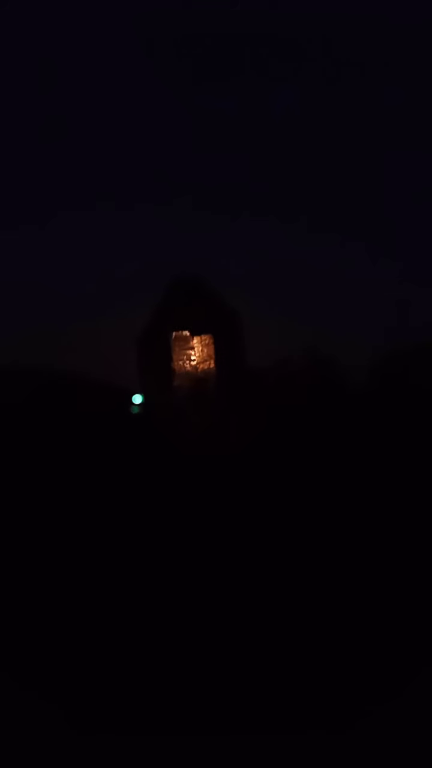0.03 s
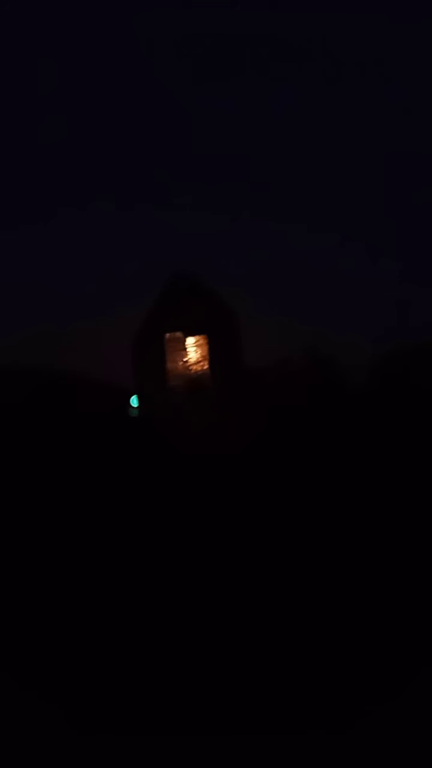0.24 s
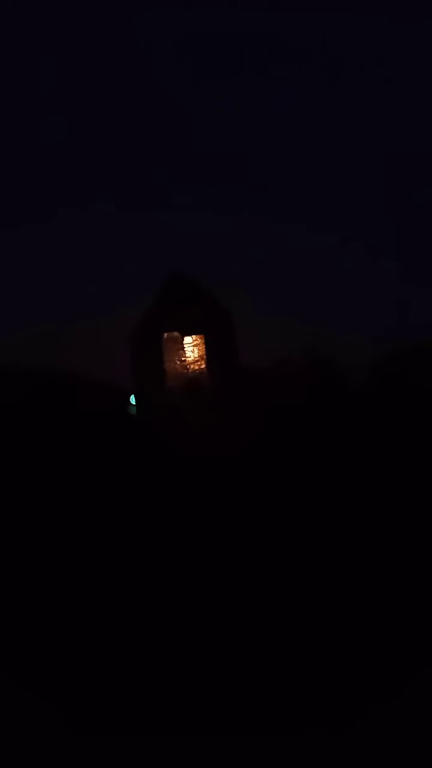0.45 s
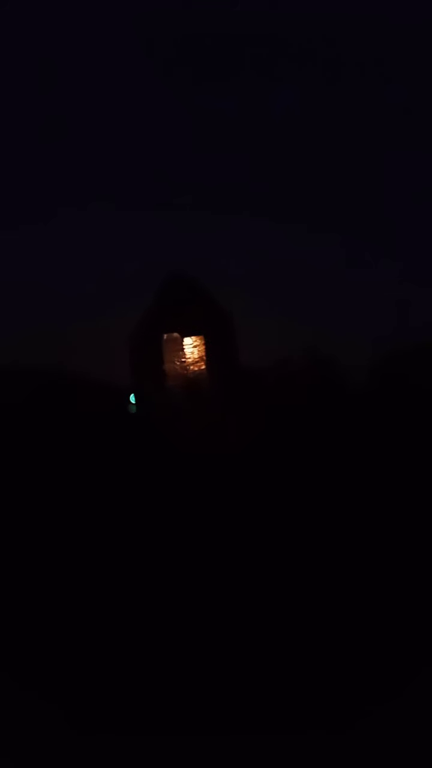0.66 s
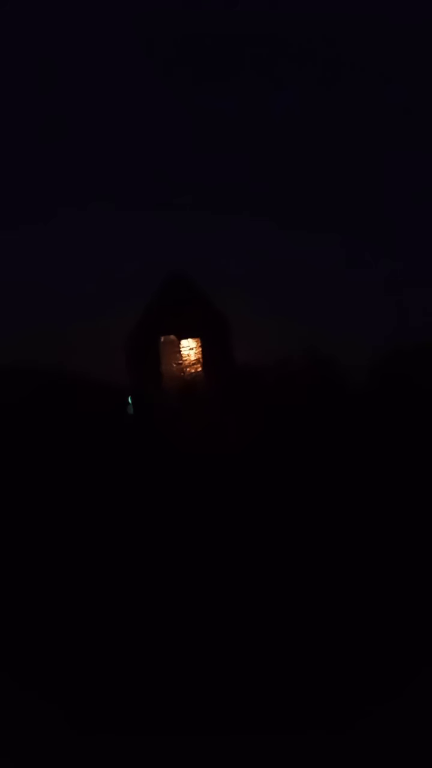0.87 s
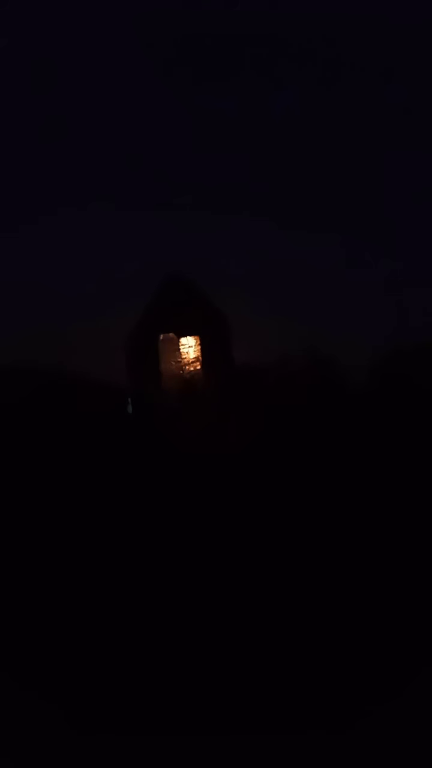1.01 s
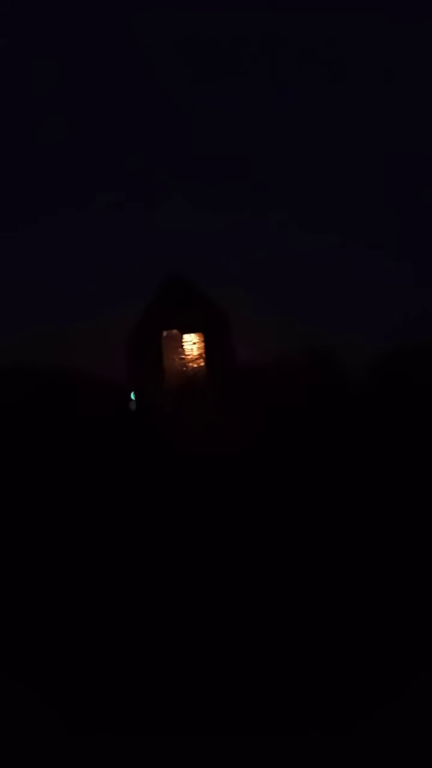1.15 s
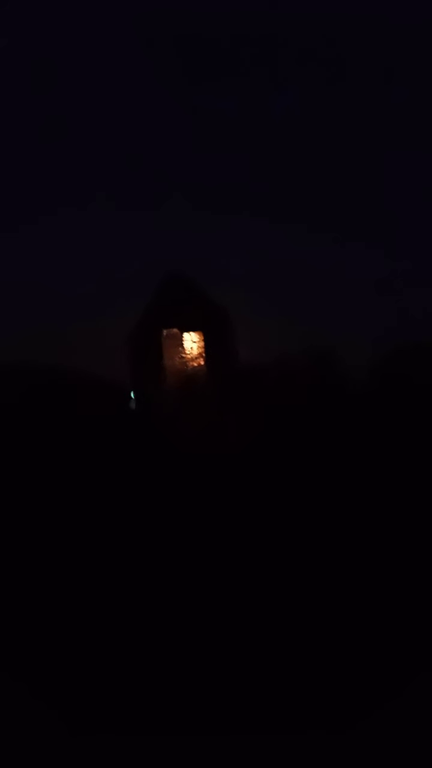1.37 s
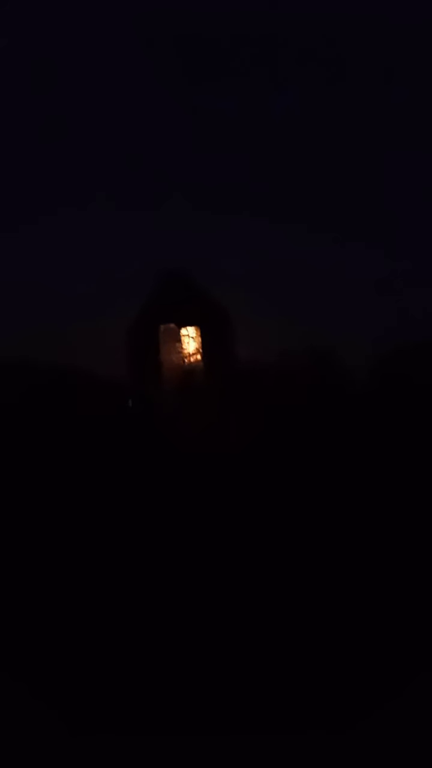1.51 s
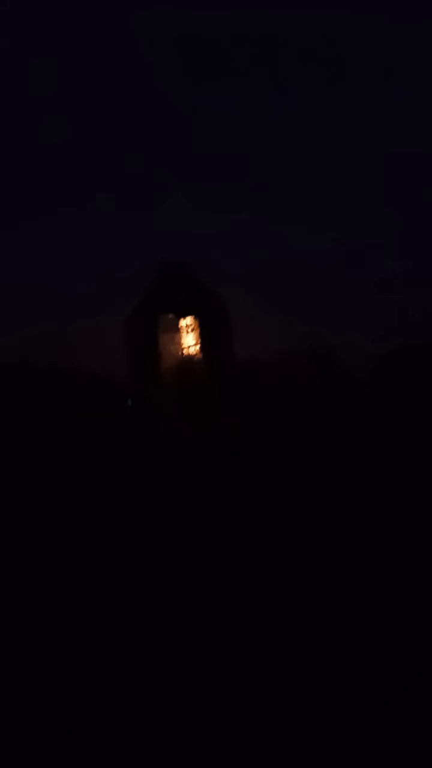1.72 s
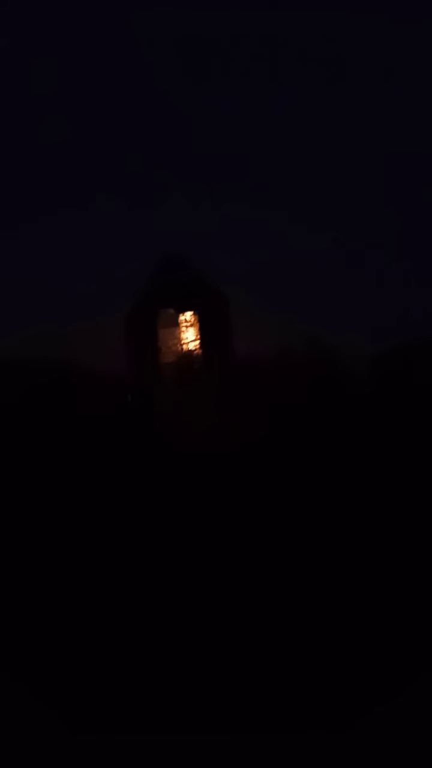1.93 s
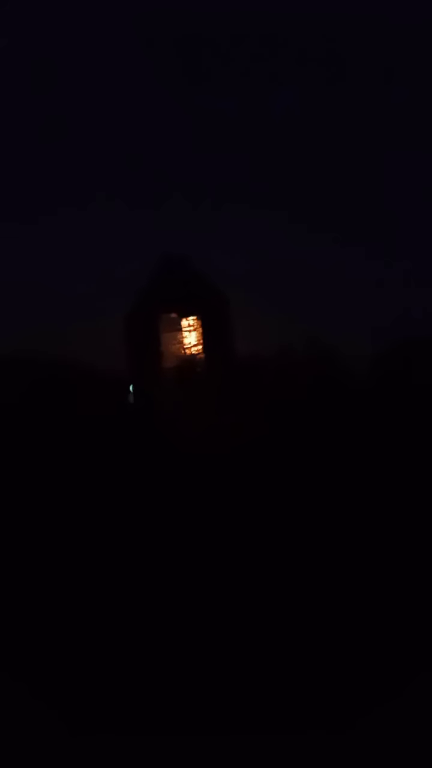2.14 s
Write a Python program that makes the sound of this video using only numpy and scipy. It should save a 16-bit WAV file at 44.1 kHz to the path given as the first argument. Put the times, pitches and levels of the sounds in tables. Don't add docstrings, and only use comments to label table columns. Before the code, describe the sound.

Crickets chirp in a dense high-pitched pulsing chorus across a quiet meadow at night

```python
import sys
import numpy as np
from scipy import signal
from scipy.io import wavfile
from scipy.ndimage import uniform_filter1d

SR = 44100
rng = np.random.default_rng(int(sys.argv[2]) if len(sys.argv) > 2 else 0)


def to_linear_factor(level_db):
    exponent = np.asarray(level_db, float) / 20
    return 10 ** exponent


def to_wav(sig):
    pcm = np.clip(np.atleast_2d(sig), -1, 1) * 32767
    pcm = np.round(pcm).astype(np.int16)
    wavfile.write(sys.argv[1], SR, pcm.T)


N = 96314
T = np.arange(N) / SR

# pitch_hz, pitch_spread_hz, pulses_per_s, sounding_share, level_db
CROWDS = [(2605.1, 110, 60, .45, -47.5), (3186, 150, 65, .45, -49), (4577, 300, 70, .5, -50.5),
          (5483, 240, 60, .5, -38), (5960, 280, 220, 0.33, -56), (7026, 160, 80, .6, -37.5)]
# time_s, level_db
CROWD_SURGE = [(0, -7), (.25, 3.5), (.5, 4.5), (.75, 2), (.95, -8), (1.2, -1), (1.45, 5), (1.75, 3.5),
               (2.2, -11)]
# start_s, length_s, level_db, pitch_hz
TRILLS = [
    (0.189, 0.16, -37.5, 5390),
    (0.197, 0.153, -41, 5653),
    (0.565, 0.11, -40.5, 5600),
    (0.797, 0.17, -43, 5383),
    (1.121, 0.083, -48, 5505),
    (1.388, 0.18, -39, 5400),
    (1.454, .17, -41.5, 5700),
    (1.848, 0.18, -35, 5528),
    (2.011, .2, -40, 5690),
    (2.0, 0.12, -41.5, 5350),
]
# start_s, length_s, level_db
FROG_BOUTS = [
    (-.1, 2.4, -64),
    (0.219, 0.098, -57),
    (0.346, 0.079, -55),
    (.45, .08, -59),
    (0.567, .16, -62.5),
    (0.769, .1, -58.5),
    (1.244, 0.22, -59.5),
    (1.479, 0.085, -57.5),
    (1.598, .33, -60.5),
]
# time_s, pitch_hz, wing_db, low_wing_db, rasp_db
CLOSE_SONG = [
    (0.0, 6530, -17, -38, -29),
    (0.006, 6570, -28, -29, -35),
    (0.012, 6880, -23.5, -27, -31),
    (0.04, 7066, -20.5, -34, -34),
    (0.054, 6409, -19.5, -32, -33.5),
    (0.064, 7067, -35, -33, -33.5),
    (0.078, 6500, -16, -31.5, -42),
    (0.092, 6640, -28, -37, -41),
]
# frequency_hz, level_db (per Hz)
RASP_SPECTRUM = [(1760, -75), (3000, -31.5), (5410, -12.5), (5960, -6.5), (6870, -1.5), (8650, -23.5),
                 (13900, -29)]
# start_s, length_s, level_db
SCRAPES = [
    (0.966, .035, -45),
    (1.015, 0.047, -47.5),
    (1.076, 0.046, -46.5),
]
# frequency_hz, width_hz, level_db
SCRAPE_MODES = [(7600, 630, 6.5), (9140, 1200, -6.5), (11200, 1470, -11)]
# frequency_hz, level_db, t60_s
STEM_MODES = [(470, 2.5, 0.063), (600, -8, .04), (730, 0.5, 0.044), (860, -14, 0.26)]
# frequency_hz, width_hz, level_db
MOTOR_TONES = [(79.8, 7.9, -74), (116.2, 6.9, -79), (162.7, 11.3, -68), (245.7, 3.2, -77.5),
               (236.3, 15.8, -65.5), (978, 7.3, -86.5), (1036, 2.2, -82), (1274, 4.8, -85)]
# time_s, level_db
MOTOR_LOAD = [(0.0, -85), (0.03, -94), (0.07, -67), (0.15, -78), (0.19, -58), (0.24, -76), (0.47, -60),
              (0.66, -72.5), (0.69, -61), (0.79, -73), (1.03, -58), (1.08, -72), (1.12, -59), (1.34, -70),
              (1.37, -58), (1.53, -71.5), (1.82, -63), (2.18, -64.5)]
# start_s, length_s, level_db
MOTOR_WHINES = [
    (.665, .06, -67.5),
    (1.017, 0.059, -80),
    (1.728, .08, -70),
]
# frequency_hz, level_db (per Hz)
RUMBLE_SPECTRUM = [(20, -18), (60, -14), (150, -3), (250, -5.5), (300, -15), (450, -18.5), (600, -28.5),
                   (900, -67)]
# frequency_hz, level_db (per Hz)
HISS_SPECTRUM = [(4820, -46), (8200, 0), (8820, -4.5), (10300, -4), (11400, -9.5), (13400, -9), (13900, -1)]
# time_s, level_db
HISS_FADE = [(0, -0.5), (1.3, 1), (1.45, -0.5), (1.75, -2), (1.85, -3.5), (2.2, -3.5)]
# frequency_hz, level_db (per Hz)
AIR_SPECTRUM = [(500, -41), (1000, -30.5), (1600, -28.5), (2300, -18.5), (3700, -12.5), (6400, 1),
                (7600, -4.5), (8400, -28.5)]
# frequency_hz, threshold_db (against the usual level there)
DROP_THRESHOLD = [(900, -7), (1200, -4.5), (2200, -4.5), (2500, -10), (7700, -9), (8800, 0), (10200, -2.8),
                  (11500, .2), (13500, -3)]


def evened(x):
    return x / np.sqrt(np.mean(x ** 2) + 1e-20)


def over_time(curve):
    return np.interp(T, *np.transpose(curve))


def drift(per_s):
    count = int(N / SR * per_s) + 4
    return 1.2 * np.interp(T * per_s, np.arange(count), rng.standard_normal(count))


def gate(start, length, edge):
    t = T - start
    return np.clip(np.minimum(t, length - t) / edge, 0, 1)


def resonate(x, hz, width):
    turn = np.exp(2j * np.pi * np.cumsum(hz * np.ones(len(x))) / SR)
    r = np.exp(-np.pi * width / SR)
    return 2 * (turn * signal.lfilter([1 - r], [1, -r], x / turn)).real


def double_resonate(x, hz, width):
    return resonate(resonate(x, hz, width), hz, 2 * width)


def coloured(spectrum, patch_db):
    frames = N // 256 + 5
    hz = np.fft.rfftfreq(1024, 1 / SR)
    a, b, patches = rng.standard_normal((frames, 513, 3)).T
    patches = uniform_filter1d(patches, size=10, axis=0)
    patches = evened(uniform_filter1d(patches, size=10, axis=1))
    f, level = np.transpose(spectrum)
    shape = np.interp(np.log(hz + 1), np.log(f + 1), level, left=-80, right=-80)
    z = (a + 1j * b) * to_linear_factor(shape[:, None] + patch_db * patches)
    return evened(signal.istft(z, nperseg=1024, noverlap=768)[1][:N])


def singer(hz, rate, duty, phase, wander=.012, loose=.25):
    strokes = np.cumsum(rate * (1 + loose * np.tanh(drift(per_s=12)))) / SR + phase
    place = np.minimum(strokes % 1 / np.clip(duty, .1, 1), 1)
    sag = .03 * (.5 - place)
    pitch = hz * (1 + sag + wander * drift(per_s=25))
    return np.sin(np.pi * place) * np.sin(2 * np.pi * np.cumsum(pitch) / SR)


def crowd(hz, spread_hz, rate, duty):
    count = 10
    weights = signal.windows.cosine(count + 2)[1:-1]
    offsets = np.linspace(-1.6, 1.6, count)
    chances = rng.uniform(-1, 1, (count, 4))
    out = np.zeros(N)
    for offset, weight, (detune, tempo, phase, size) in zip(offsets, weights, chances):
        voice = singer(hz + spread_hz * (offset + .2 * detune), rate * (1 + .15 * tempo), duty, phase)
        loudness_db = 1.2 * size + 1.5 * drift(per_s=7.13)
        out += weight * to_linear_factor(loudness_db) * voice
    return evened(out)


def far_crickets():
    voices = [to_linear_factor(db) * crowd(hz, spread, rate, duty) for hz, spread, rate, duty, db in CROWDS]
    throb_hz, throb_db, throb_peak_s = 5.13, 1.5, 0.26
    voices[-1] = voices[-1] * to_linear_factor(throb_db * np.cos(2 * np.pi * throb_hz * (T - throb_peak_s)))
    voices[2] = voices[2] * to_linear_factor(over_time(CROWD_SURGE))
    far = sum(voices)
    return to_linear_factor(-1.0) * (far + to_linear_factor(-6) * echoes(far))


def near_trills():
    rate = 63
    trills = np.zeros(N)
    for start, length, db, hz in TRILLS:
        voice = singer(hz, rate, duty=.6, phase=-start * rate, wander=.004, loose=0)
        trills += to_linear_factor(db) * gate(start, length, edge=.008) * evened(voice)
    return trills * to_linear_factor(1.5 * drift(per_s=150))


def frogs():
    bouts = sum(to_linear_factor(db) * gate(start, length, edge=0.016) for start, length, db in FROG_BOUTS)
    croaks = to_linear_factor(1.5 * drift(per_s=8.9))
    return bouts * croaks * crowd(hz=1954, spread_hz=83, rate=68, duty=0.67)


def close_insect():
    time, hz, wing_db, low_db, rasp_db = np.transpose(CLOSE_SONG)
    pitch = np.interp(T, time, hz)
    teeth = rng.standard_normal((N, 2)).T
    clean = .76
    tone = clean * evened(np.sin(2 * np.pi * np.cumsum(pitch) / SR))
    tone = tone + (1 - clean) * evened(double_resonate(teeth[0], pitch, width=300))
    low = double_resonate(teeth[1], hz=5400, width=250)
    rasp = coloured(RASP_SPECTRUM, patch_db=1.5)
    song = evened(tone) * to_linear_factor(np.interp(T, time, wing_db))
    song = song + evened(low) * to_linear_factor(np.interp(T, time, low_db))
    song = song + rasp * to_linear_factor(np.interp(T, time, rasp_db + 9.5))
    stop = np.exp(-np.maximum(T - time[-1], 0) / .002)
    return stop * song


def katydid():
    teeth = rng.standard_normal(N)
    wing = sum(to_linear_factor(db) * evened(resonate(resonate(teeth, hz, width), hz, width))
               for hz, width, db in SCRAPE_MODES)
    return wing * sum(to_linear_factor(db) * gate(start, length, edge=0.012) for start, length, db in SCRAPES)


def stem_knock():
    t = np.maximum(T - .088, 0)
    return sum(to_linear_factor(-57.5 + db - 60 * t / t60) * np.sin(2 * np.pi * hz * t) for hz, db, t60 in STEM_MODES)


def motor():
    load_db = over_time(MOTOR_LOAD) + 64
    pushes = rng.standard_normal((N + SR, len(MOTOR_TONES))).T
    tones = sum(to_linear_factor(db) * evened(double_resonate(push, hz, width)[SR:])
                for push, (hz, width, db) in zip(pushes, MOTOR_TONES))
    swells = sum(to_linear_factor(db) * gate(start, length, edge=0.02) for start, length, db in MOTOR_WHINES)
    whine = np.sin(2 * np.pi * MOTOR_TONES[5][0] * T) * swells
    rumble = to_linear_factor(-66.5 + 0.24 * load_db) * coloured(RUMBLE_SPECTRUM, patch_db=4)
    return to_linear_factor(load_db) * tones + whine + rumble


def far_hiss():
    return to_linear_factor(-56 + over_time(HISS_FADE)) * coloured(HISS_SPECTRUM, patch_db=2.0)


def night_air():
    return to_linear_factor(-40) * coloured(AIR_SPECTRUM, patch_db=1.1)


def echoes(x):
    t = np.arange(SR // 3) / SR
    t60 = 0.27
    tail = rng.standard_normal(len(t)) * to_linear_factor(-60 * t / t60) * (t > .004)
    return signal.fftconvolve(x, tail / np.linalg.norm(tail))[:N]


def scene():
    meadow = far_crickets() + near_trills() + frogs() + katydid()
    meadow = meadow + to_linear_factor(-13) * echoes(meadow)
    close = close_insect() + stem_knock()
    background = motor() + far_hiss() + night_air()
    return (meadow + close + background)[None]


def band_limit(x):
    return signal.sosfilt(signal.butter(12, 14060, fs=SR, output="sos"), x)


def record(dry):
    hz, _, z = signal.stft(dry[0], SR, nperseg=2048, noverlap=1536)
    power = uniform_filter1d(abs(z) ** 2, size=3, axis=1) + 1e-20
    patch_db = 10 * np.log10(uniform_filter1d(power, size=5, axis=0) + 1e-20)
    usual_db = np.median(patch_db, axis=1)[:, None]
    loud_db = 10 * np.log10(power.sum(axis=0))
    mask_db = .7 * np.clip(loud_db - np.median(loud_db), -2, 2)
    recent_db = uniform_filter1d(np.minimum(patch_db - usual_db, 3), size=31, axis=1)
    f, threshold_db = np.transpose(DROP_THRESHOLD)
    margin_db = np.interp(hz, f, threshold_db, left=-20)[:, None]
    limit_db = usual_db + .65 * recent_db + margin_db + mask_db
    gain = np.where(patch_db < limit_db, to_linear_factor(-30), 1)
    mix = signal.istft(z * gain, SR, nperseg=2048, noverlap=1536)[1]
    return band_limit(mix[None, :N])


dry = scene()
out = record(dry)
to_wav(out)
```